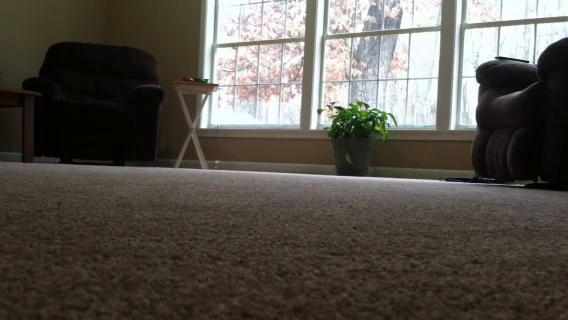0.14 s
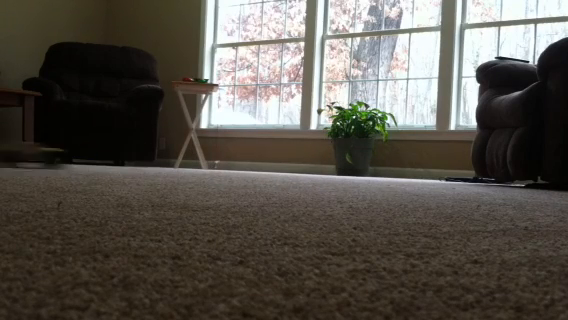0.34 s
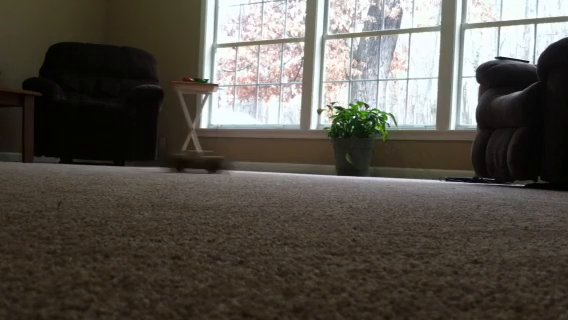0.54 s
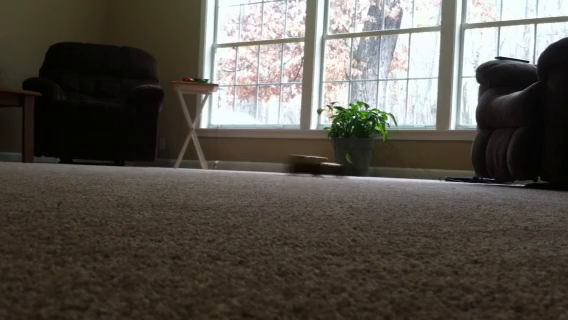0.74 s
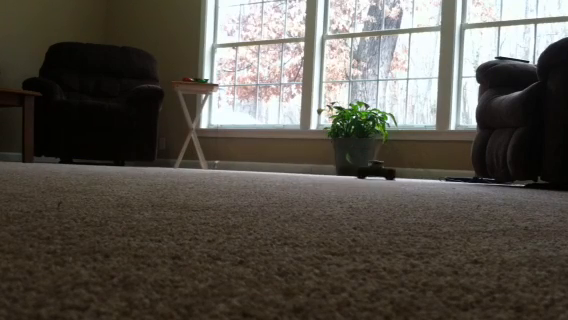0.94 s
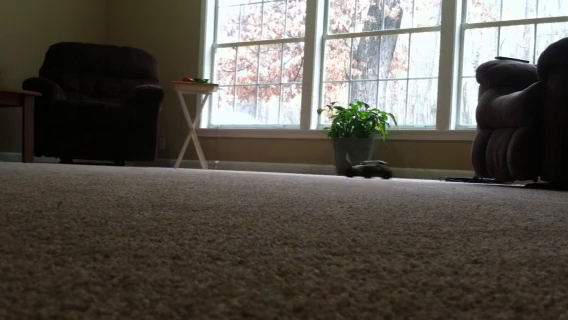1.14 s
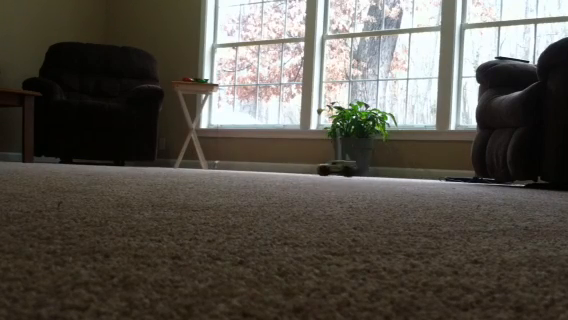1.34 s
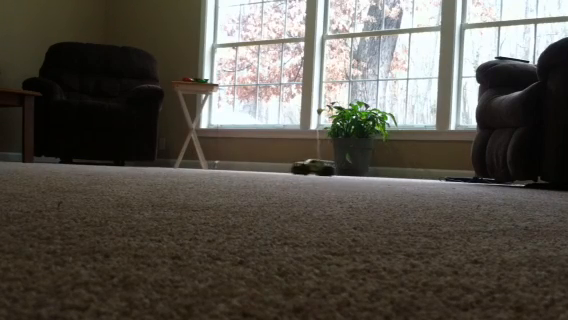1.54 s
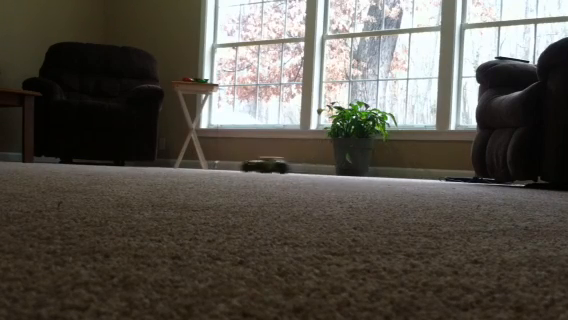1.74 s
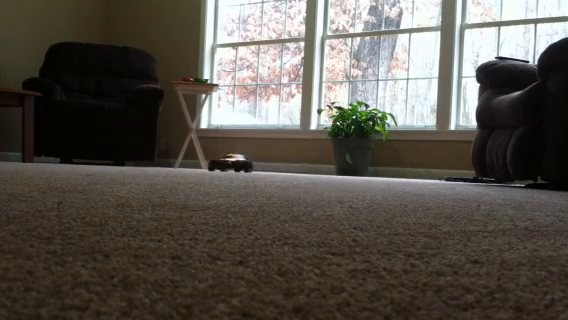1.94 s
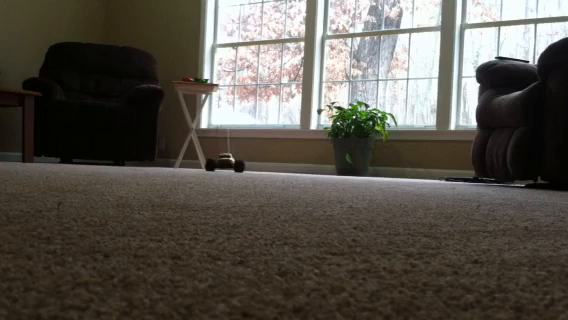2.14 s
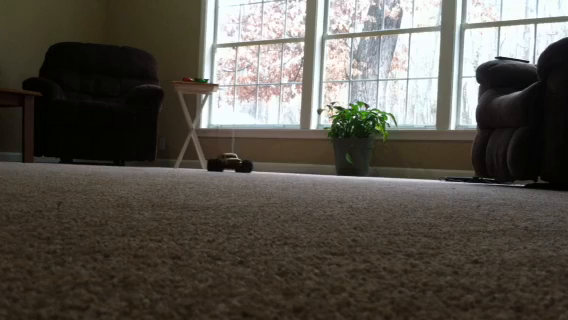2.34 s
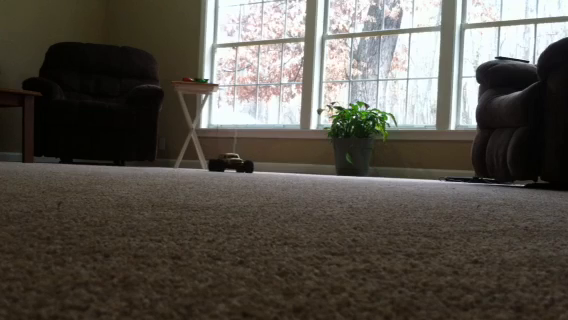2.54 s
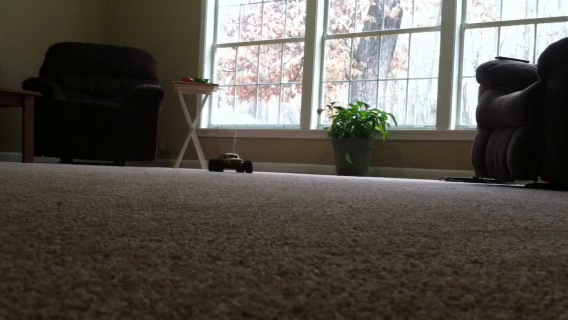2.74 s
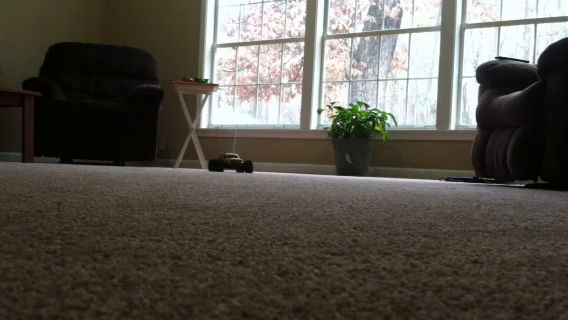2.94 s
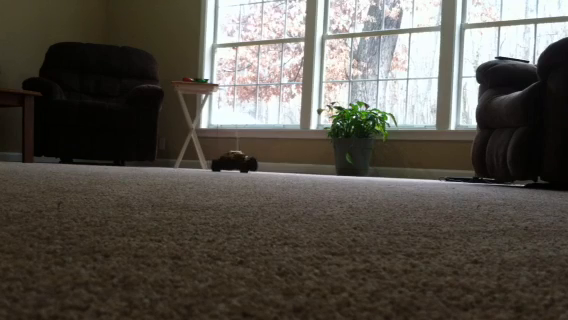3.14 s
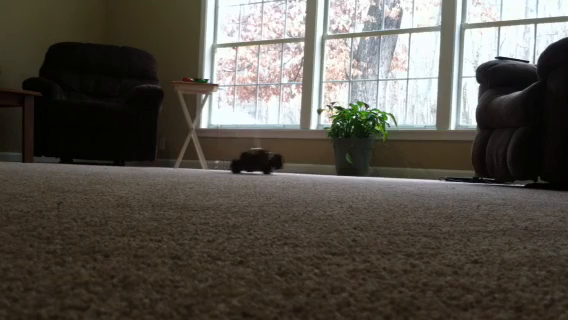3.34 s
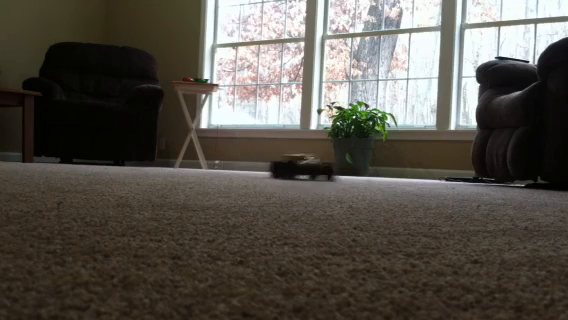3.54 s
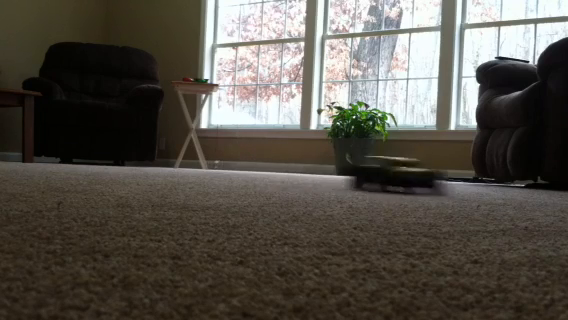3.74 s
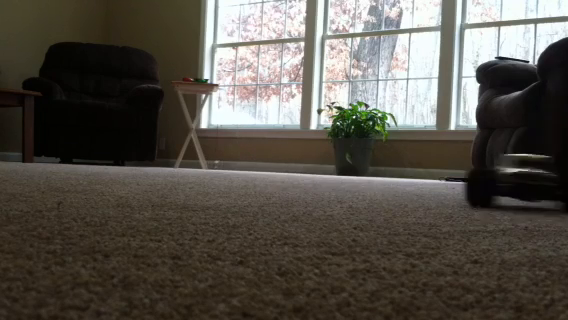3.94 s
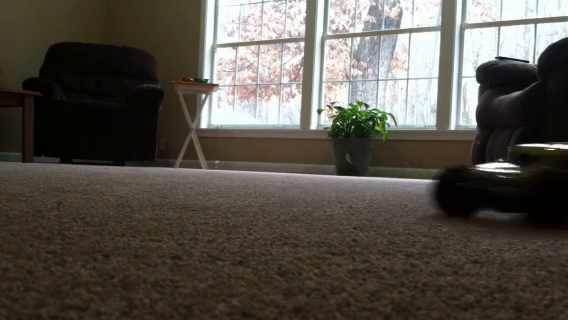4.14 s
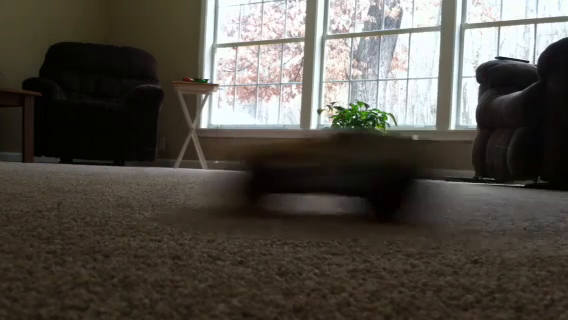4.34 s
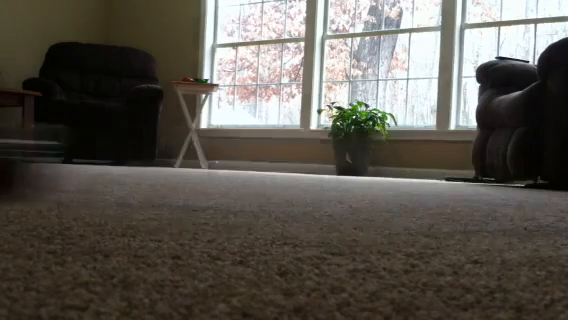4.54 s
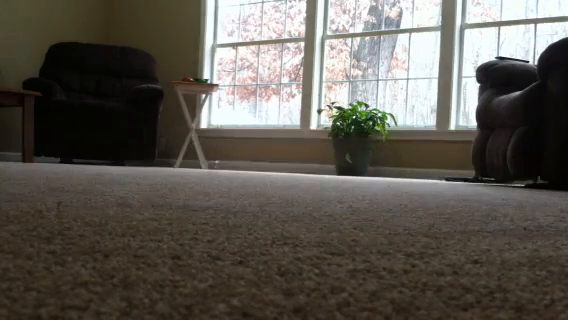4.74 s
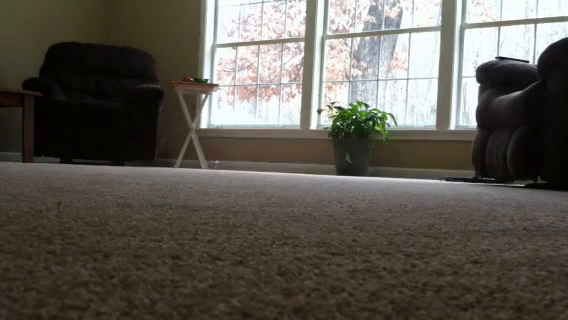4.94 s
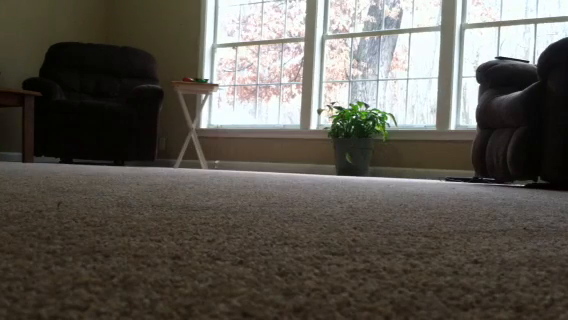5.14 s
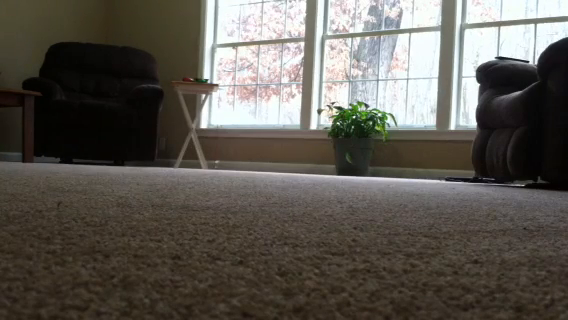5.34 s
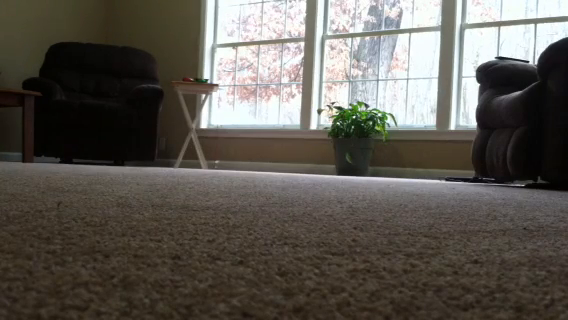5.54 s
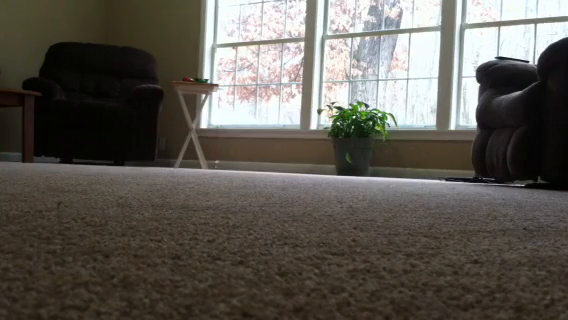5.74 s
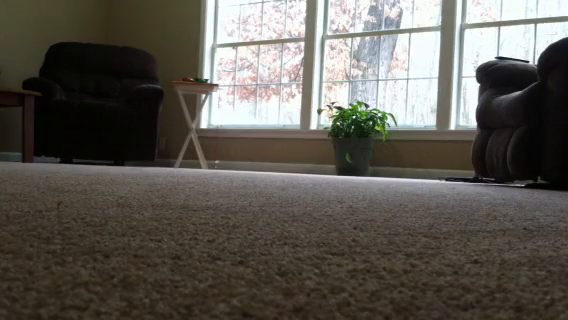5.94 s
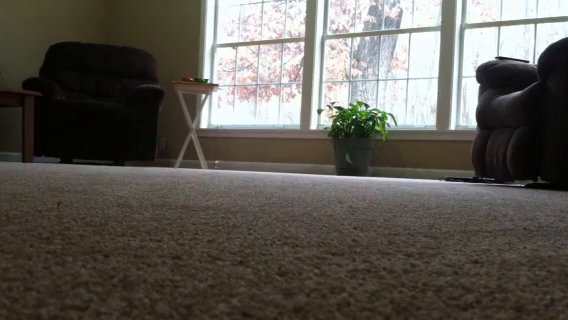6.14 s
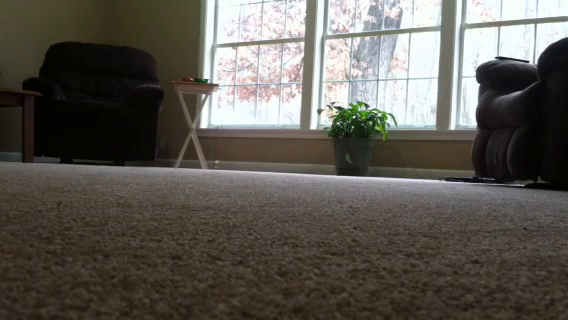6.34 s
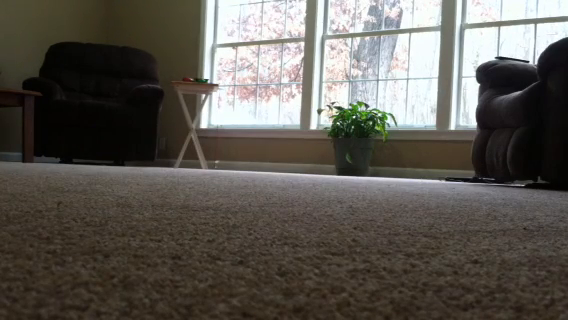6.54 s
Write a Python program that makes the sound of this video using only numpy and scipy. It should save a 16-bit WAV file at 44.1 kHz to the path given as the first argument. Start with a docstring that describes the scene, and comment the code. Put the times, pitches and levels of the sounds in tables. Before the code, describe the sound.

A small electric toy truck whines and rasps in bursts across carpet indoors, rattles close past with rapid gear clicks, then bumps something with a hollow thud.

```python
"""A whining, rattling, rasping toy truck darts about a carpeted living room, passes close by and bumps into something.
Each squeeze of the throttle sets a tooth rate that spins up, holds and coasts; tooth impacts excite the shell.
Filtered noise makes the tyre rumble, carpet brush and scrub; unsteady tooth impacts make the steering servo whirr.
Decaying tones and noise bursts make the gear ticks, the bump and one sharp click close by.
Steady sines hum like mains, a distant motor beats against them, and soft noise is the room air. Mono."""
import sys
import numpy as np
from scipy import signal
from scipy.fft import rfft, irfft, next_fast_len
from scipy.io import wavfile
from scipy.ndimage import uniform_filter1d, map_coordinates

SR = 44100
rng = np.random.default_rng(int(sys.argv[2]) if len(sys.argv) > 2 else 0)


def waveform_to_disk(signal):
    """Save audio, clipped to [-1, 1], as 16-bit WAV at the path in sys.argv[1]."""
    frames = np.transpose(np.atleast_2d(signal))
    scaled = np.clip(frames, -1, 1) * 32767
    samples = np.round(scaled).astype(np.int16)
    wavfile.write(sys.argv[1], SR, samples)


N = 295026

# All table levels are relative: the mix trims in the functions come on top.

# squeezes of the throttle: start t/s, length t/s, spin-up t/s, coasting before it stops t/s,
# tooth rate after spin-up f/Hz, further climb/(Hz/s), coasting tooth rate f/Hz, slowing/(Hz/s),
# coasting fade/(dB/s), rattle level/dB, rasp level/dB, tyre rumble level/dB, brushed carpet level/dB,
# whine re rattle under power level/dB, whine re rattle while coasting level/dB
THROTTLE_SQUEEZES = [ (0.0, 0.057, 0.01, 0.064, 979, 3, 910, 600, 23.5, -49, -59, -84, -61.5, 2, 2),
                     (0.0, 0.4, 0.19, .27, 2000, 300, 1150, 1200, 3, -45, -45.5, -56.5, -54.5, -1, -2),
                     (0.529, 0.2, 0.15, 0.19, 1370, 1202, 1454, 136, 4, -53, -55, -63.5, -62, -14, -5.5),
                     (0.939, 0.22, 0.089, 0.27, 1944, 4499.5, 1600, 1900, 11, -49, -49.5, -58.5, -60.5, -26, 1),
                     (1.522, 0.069, 0.02, 0.05, 972, -2, 945, 574, 33.5, -56, -67, -62, -72.5, -3, -2),
                     (1.559, 0.2, .15, 0.68, 1986, -4.5, 1208, 580, 19.5, -47, -53, -60, -62, 1.5, -7),
                     (3.058, 0.15, 0.025, 0.045, 973.2, 1, 942, 690, 32.5, -55, -73, -62, -97, -5, -10),
                     (3.15, .35, .19, .3, 1955, 4000, 1406, 603, 33, -47, -51.5, -59.5, -58.5, -2.5, -5),
                     (3.431, 0.28, 0.12, 0.22, 2973, 2000.5, 1016, 393, -10, -51, -50.5, -55, -53, -2.5, -15),
                     (3.857, 0.25, 0.053, 0.04, 1007, 0.5, 952, 630, 51, -54, -61, -56.5, -63.5, 3, -13),
                     (4.187, .146, .008, 0.02, 1308, 4499, 1380, 602, 38.5, -45, -83, -55, -63.5, 5.5, -2),
                     (4.205, 0.043, .02, 0.011, 2046, 2999, 1500, 600, 43.5, -47, -57, -68, -64, -8, -1),
                     (4.295, .125, 0.076, 0.11, 2779, -4, 2206, 600, 39, -42, -58, -56.5, -55.5, 1.5, -12),
                     (4.431, 0.095, 0.076, 0.054, 2288, 0.5, 1907, 594, 43.5, -43, -60, -56.5, -77, -16, -26),
                     (4.521, .21, 0.058, 0.081, 3162, 3001, 3503, 1.05, 70.5, -44, -54.5, -56.5, -54, -3.5, 4),
                     (4.74, 0.28, 0.077, .12, 1500, 1, 1349, 550, 40, -55.5, -57.5, -60.5, -58, -25, -20),
                     (5.021, 0.16, .11, .33, 1955, 5000, 1399, 500, 19, -46.5, -46.5, -54, -55, -12, -0.5),
                     (5.413, 0.23, 0.2, 0.43, 2034, 2999.5, 1359, 400, 0, -43.5, -42.5, -61, -54.5, -3, 0)]
# the truck's path: t/s, distance from the microphone/m
TRUCK_PATH = [(0, 2.24), (2.3, 1.67), (3.2, 3.13), (3.75, 1.25), (4.05, 1.1), (4.35, 0.86), (4.62, 0.61),
              (4.9, 1.24), (5.4, 1.69), (6.2, 2.26)]
CRAWL_HZ, FULL_HZ = 931, 2108  # slowest tooth rate; the rate beyond which speed adds no level
SETTLE_S, STOP_S = .045, .22  # time constant of the drop on release; 60 dB fade as the wheels stop
RATTLE_DB_PER_OCTAVE, RASP_DB_PER_OCTAVE = 8, 16  # louder with speed
RUMBLE_DB_PER_OCTAVE, BRUSH_DB_PER_OCTAVE = 5.5, 18
TYRE_LAG_S, TYRE_COAST_DB = 0.075, -2.5  # truck lags its motor; less rumble when the tyres no longer pull
SPUR_TEETH, RUB_DB = 61, 9.5  # the wobbling spur gear swings the coasting rasp this much once a turn
LOAD_WHINE_DB = 2  # the whine stands out most halfway through spin-up
ROOM_RADIUS_M = 1.47  # direct sound and echoes are equally loud here


def drive():
    """Each squeeze spins the motor up, holds it and lets it coast; speed and distance set the levels."""
    step = .002  # seconds per control point
    t = np.arange(0, N / SR, step)
    columns = np.transpose(THROTTLE_SQUEEZES)[:, :, None]
    start, length, spin_up, roll, top, climb, coast, slowing, fade = columns[:9]
    rattle_db, rasp_db, rumble_db, brush_db, whine_db, coast_whine_db = columns[9:]

    ramp = np.pi * np.clip((t - start) / spin_up, 0, 1)
    coasting = np.maximum(t - start - length, 0)
    released = coasting > 0
    load = np.exp(-coasting / SETTLE_S)
    rolling = (t >= start) * amp(-60 * np.maximum(coasting - roll, 0) / STOP_S)

    driven = CRAWL_HZ + (top - CRAWL_HZ) * (1 - np.cos(ramp)) / 2
    driven = driven + climb * np.maximum(t - coasting - start - spin_up, 0)
    speed = np.maximum(coast + (driven - coast) * load - slowing * coasting, CRAWL_HZ)

    spur_turns = np.cumsum(speed * released, axis=1) * step / SPUR_TEETH
    rub_db = RUB_DB * (np.cos(np.pi * spur_turns) ** 4 - .5) * released
    wet = 1 / (1 + (ROOM_RADIUS_M / np.interp(t, *np.transpose(TRUCK_PATH))) ** 2)
    octaves = np.log2(np.minimum(speed, FULL_HZ) / np.minimum(top, FULL_HZ))

    def power(db, per_octave):
        """Power of each squeeze: echoes alone, raised by the direct sound when near."""
        gain = rolling * amp(db + per_octave * octaves - fade * coasting)
        return gain ** 2 / wet + 1e-20

    def level(db, per_octave):
        """Gain of all squeezes together."""
        return np.sqrt(power(db, per_octave).sum(0))

    def lagged(gain):
        """Gain that follows the motor with the truck's inertia."""
        keep = np.exp(-step / TYRE_LAG_S)
        return signal.lfilter([1 - keep], [1, -keep], gain, zi=[keep * gain[0]])[0]

    def loudest(values):
        """Average over the squeezes, weighted by rattle power."""
        return np.average(values + 0 * t, axis=0, weights=power(rattle_db, RATTLE_DB_PER_OCTAVE))

    power_whine_db = whine_db + LOAD_WHINE_DB * np.sin(ramp)
    controls = dict(
        mesh_hz=CRAWL_HZ + (rolling * (speed - CRAWL_HZ)).max(0),
        wet=wet,
        rattle=level(rattle_db, RATTLE_DB_PER_OCTAVE),
        rasp=level(rasp_db + rub_db, RASP_DB_PER_OCTAVE),
        rumble=lagged(level(rumble_db + TYRE_COAST_DB * released, RUMBLE_DB_PER_OCTAVE)),
        brush=lagged(level(brush_db, BRUSH_DB_PER_OCTAVE)),
        whine_db=loudest(coast_whine_db + (power_whine_db - coast_whine_db) * load),
        load=loudest(load))
    return {name: np.interp(np.arange(N) / SR, t, values) for name, values in controls.items()}


# gearbox shell resonances at low, high and full speed: f/Hz, width f/Hz, level/dB
SHELL_LOW_MODES = [(913, 115, 4.5), (1298, 160, 6), (1760, 520, -4)]
SHELL_HIGH_MODES = [(1475, 540, -0.5), (2037, 243, 3.5), (2394, 620, -4)]
SHELL_FULL_MODES = [(1330, 300, -5), (1680, 280, 1.5), (2020, 220, -2.5)]
# tooth rates at which the low, high and full-speed resonances each have the shell to themselves: f/Hz
SHELL_TAKEOVER = [1305, 2160, 2820]
# how well the shell radiates the whine: f/Hz, level/dB
WHINE_RADIATION = [(500, 1), (780, 1), (950, -1), (1130, -7.5), (1330, 3), (1520, 1), (1730, -0.5),
                   (2000, -0.5), (2300, 1), (2800, -1.5), (3400, 1), (4200, 5.5), (5200, 5), (7500, -7)]
# spectrum of the rasping tooth edges: f/Hz, level/dB
RASP_SPECTRUM = [(500, -58), (2000, -46), (3100, -15), (3700, 0.5), (4200, 5.5), (4850, 2.5), (5600, 8),
                 (6700, 3.5), (8000, -3.5), (10000, -19), (12500, -24), (16000, -65)]
HUNT, HUNT_RATE = .012, 70  # a free-running gear train hunts: share of the tooth rate, knots a second
BEAM_DB, OVERTONE_DB = 19, -19  # full-speed whine is beamed, fading from afar; second partial
HOUSING_DB = -6  # pinion housing ring re shell, heard mainly from near


def gears(truck):
    """Tooth impacts rattle the shell and rasp; their regular part is a rough whine."""
    mesh_hz, wet, load = truck["mesh_hz"], truck["wet"], truck["load"]
    shares = [np.interp(mesh_hz, SHELL_TAKEOVER, row) for row in np.eye(3)]  # each speed wakes its modes
    beamed = wet * np.sqrt(shares[2])

    mesh_hz = mesh_hz * (1 + HUNT * (1 - load) * wobble(HUNT_RATE))
    shake = .013 * wobble(30) + .024 * wobble(350)  # slow load changes and fast backlash
    mesh_hz = mesh_hz * (1 + (1 + 2 * load) / 3 * shake)

    phase = 2 * np.pi * np.cumsum(mesh_hz) / SR
    pinion_teeth, runout = 14, .55
    lopsided = 1 + runout * np.sin(phase / pinion_teeth)  # an off-centre pinion adds sidebands
    chatter = unit(amp(2 * wobble(240)))
    partials = np.sin(phase) + amp(OVERTONE_DB) * np.sin(2 * phase)
    whine = unit(chatter * lopsided) * np.sqrt(2) * partials
    whine = filtered(whine, lambda hz: amp(along(WHINE_RADIATION, hz)))

    impacts = teeth(mesh_hz, scatter=.6, uneven_db=2.0) * chatter
    mode_sets = [SHELL_LOW_MODES, SHELL_HIGH_MODES, SHELL_FULL_MODES]
    shell = sum(np.sqrt(share) * unit(ringing(impacts, modes)) for share, modes in zip(shares, mode_sets))
    housing_ring = unit(ringing(impacts, [(2740, 320, 2.3), (3465, 350, 3.0)]))
    housing = amp(HOUSING_DB) * (1 - wet) ** 2 * housing_ring

    clear = amp(truck["whine_db"] - BEAM_DB * beamed)
    box = truck["rattle"] * (housing + (shell + clear * room(whine, wet)) / np.sqrt(1 + clear ** 2))

    flutter = amp(.8 * wobble(55) + 1.1 * wobble(150))
    edges = coloured(teeth(mesh_hz, scatter=0.33, uneven_db=3.5) * flutter, RASP_SPECTRUM)
    rasp = room(truck["rasp"] * turning(edges), wet=0.27)
    return amp(-2.5) * box + amp(-1.5) * rasp


BEAMING_DB = 2.2  # rms swing of the rasp bands


def turning(x):
    """Broad bands swell and sink at random, standing in for beaming as the truck's heading changes."""
    z = signal.stft(x, nperseg=512)[2]
    field = rng.standard_normal(z.shape)
    for size, axis in [(6, 0), (4, 0), (24, 1), (12, 1)]:  # smooth over frequency, then over time
        field = uniform_filter1d(field, size, axis)
    gain = unit(amp(BEAMING_DB * unit(field)))
    return signal.istft(z * gain, nperseg=512)[1][:N]


# spectra of the rumbling treads and the carpet fibres: f/Hz, level/dB
TREAD_SPECTRUM = [(25, -50), (60, -31), (120, -15.5), (220, -9), (310, -3.5), (410, -4.5), (520, -1),
                  (720, -2.5), (950, 1.5), (1150, -4.5), (2000, -7.5), (5000, -41.5)]
FIBRE_SPECTRUM = [(300, -51), (1500, 12.5), (3500, 4.5), (7000, 11.5), (9000, 5.5), (12000, 3), (13500, -7),
                  (15800, -19)]
# tyres scrub sideways in tight turns: start t/s, length t/s, level/dB
TYRE_SCRUBS = [(1.0, 0.19, -52.5), (3.87, 0.39, -54.5), (5.08, 0.07, -51)]
# resonances of the scrubbing tyres and chassis: f/Hz, width f/Hz, level/dB
CHASSIS_MODES = [(520, 150, 12), (1010, 400, -6), (2470, 320, 3)]
SCRUB_ATTACK_S, SCRUB_RELEASE_S = 0.041, 0.23


def tyres(truck):
    """Treads drum on the floor, brush the carpet pile and growl in the turns, all from uneven noise."""
    rumble = coloured(rng.standard_normal(N) * amp(1.3 * wobble(70)), TREAD_SPECTRUM)
    pile = coloured(rng.standard_normal(N) * amp(0.87 * wobble(150)), FIBRE_SPECTRUM)
    growl = unit(ringing(rng.standard_normal(N) * amp(4.5 * wobble(120)), CHASSIS_MODES))
    scrub = swells(TYRE_SCRUBS, SCRUB_ATTACK_S, SCRUB_RELEASE_S) * growl
    return amp(3.0) * truck["rumble"] * rumble + amp(5.5) * truck["brush"] * pile + scrub


# gear teeth catch and tick: t/s, middle level/dB, treble level/dB
TOOTH_TICKS = [(1.524, -63, -96), (3.89, -36.5, -39), (3.914, -42, -52), (3.937, -37, -54),
               (4.108, -47, -55), (4.1515, -38, -58), (3.963, -34, -47), (3.998, -31.8, -49),
               (4.028, -32.5, -50), (4.0608, -30, -37), (4.2731, -31, -38), (4.301, -32, -50),
               (4.334, -34, -49), (4.357, -27, -34), (4.403, -28, -33), (4.538, -29, -33),
               (4.5623, -33, -51), (4.833, -39, -32), (4.858, -39, -33), (4.883, -37, -34),
               (4.908, -41, -36), (4.942, -40, -32), (4.969, -40, -32), (4.998, -36, -32.5),
               (5.034, -38, -32.5), (5.062, -41, -36), (5.088, -35, -31), (5.2371, -39, -33),
               (5.271, -41, -33), (5.36, -57, -38)]
# the shell ringing under a tick: f/Hz, level/dB, 60 dB decay t/s
TICK_MODES = [(1630, -3.5, 0.018), (2050, -3.5, 0.017), (2497, -6.5, .014)]


def ticks():
    """A catching tooth snaps and briefly rings the shell."""
    t = np.arange(SR // 4) / SR
    low, high = np.zeros((2, N))
    for s, middle_db, treble_db in TOOTH_TICKS:
        detune = 1 + .03 * rng.standard_normal(len(TICK_MODES))
        ring = sum(amp(db - 60 * t / t60) * np.sin(2 * np.pi * hz * k * t)
                   for (hz, db, t60), k in zip(TICK_MODES, detune))
        add(low, s, amp(middle_db + 3) * ring * (1 - np.exp(-t / .0004)))
        add(high, s, amp(treble_db) * burst(t60=0.021))
    return room(low + amp(5.0) * ringing(high, [(5000, 2200, 0)]), wet=0.25)


# body and wheels hit an obstacle: t/s, thud level/dB, clack level/dB
BUMP_BLOWS = [(6.131, -37.5, -65), (6.138, -36, -36.5), (6.146, -33, -42), (6.154, -29, -31.5),
              (6.166, -27, -36), (6.179, -28.5, -35), (6.203, -43, -57), (6.224, -40, -60)]
# spectrum of the thuds: f/Hz, level/dB
THUD_SPECTRUM = [(30, -54), (80, -26), (125, -10), (200, -2.5), (260, -6.5), (340, -6.5), (480, -4.5),
                 (650, -1), (850, 3.5), (1100, -3), (1600, -4), (2100, -9), (3000, -17), (5700, -20.5),
                 (15700, -45)]
# hard plastic in the bump: f/Hz, width f/Hz, level/dB
CLACK_MODES = [(5670, 2100, 0.5), (9000, 2200, -6)]
# the hollow ring of the bump: f/Hz, level/dB, 60 dB decay t/s
HOLLOW_MODES = [(208, -8, 0.88), (358, 10, 0.28), (505, -1, 0.37), (664, 7, 0.087), (737, 6, 0.29),
                (798, 3, 0.2), (836, -3, 0.73), (910, -4, 0.52), (1110, 0.5, 0.25), (1270, 0, 0.31)]
BUMP_GIVE_S = .004


def bump():
    """Bumper, body and wheels strike in quick turn, thud and clack; a hollow ring and the room answer."""
    blows, clacks, boom = np.zeros((3, N))
    give = 1 - np.exp(-np.arange(SR // 4) / SR / BUMP_GIVE_S)  # soft plastic yields before it pushes back
    for s, db, clack_db in BUMP_BLOWS:
        add(blows, s, amp(db) * burst(t60=0.055) * give)
        add(clacks, s, amp(clack_db) * burst(t60=0.042))

    t = np.arange(SR // 2) / SR
    ring = sum(amp(db - 60 * t / t60) * np.sin(2 * np.pi * (hz * t + rng.random()))
               for hz, db, t60 in HOLLOW_MODES)
    add(boom, 6.152, amp(-44.5) * ring * (1 - np.exp(-t / .012)))

    thuds = filtered(blows, lambda hz: unit(amp(along(THUD_SPECTRUM, hz))))
    return boom + amp(7.5) * room(thuds + ringing(clacks, CLACK_MODES), wet=0.43)


# the steering servo turns the wheels: start t/s, length t/s, level/dB
STEERING = [(.55, 0.18, -50.5), (2.33, 0.2, -55), (2.69, 0.036, -58), (2.84, 0.075, -56),
            (3.03, 0.059, -65), (6.04, 0.16, -51), (6.34, 0.085, -57.5), (6.49, 0.09, -65)]
# spectrum of the servo whirr: f/Hz, level/dB
SERVO_SPECTRUM = [(1880, -41), (3200, -38), (3350, -39), (4010, -19), (4460, -16.5), (5630, -6), (6100, -7),
                  (7550, -1.5), (11300, -10), (12300, -19), (14100, -20), (15700, -26)]
STEER_ATTACK_S, STEER_RELEASE_S = 0.054, 0.38


def servo():
    """The tiny steering gears spin too fast and unevenly for a pitch: a thin hissing whirr."""
    impacts = teeth(2400 * (1 + 0.064 * wobble(7.3)), scatter=0.35, uneven_db=3)
    whirr = unit(room(coloured(impacts, SERVO_SPECTRUM), wet=0.96))
    return amp(-0.5) * swells(STEERING, STEER_ATTACK_S, STEER_RELEASE_S) * whirr


# the ring of the close click: f/Hz, level/dB, 60 dB decay t/s
CLICK_MODES = [(512, 4, 0.031), (640, 5.5, 0.03), (897, 1.5, 0.026), (1226, -1, 0.016), (1443, -7, 0.028),
               (1853, -5, 0.017), (2205, -7, 0.023), (2590, -2, 0.015), (3560, 0, 0.011), (4900, -1, 0.012),
               (5780, -12, 0.016), (6550, -5, .016), (7400, -4, 0.018), (8850, 0, .01), (11100, 2, .009)]


def click():
    """A bright plastic snap, then the hollow ring of a small housing."""
    t = np.arange(SR // 4) / SR
    snap, body = np.zeros((2, N))
    crack = np.sin(2 * np.pi * 9600 * t) * amp(-60 * t / 0.0012) * (1 - np.exp(-t / .0001))
    fizz = amp(-34) * burst(t60=.013)
    add(snap, 3.0444, amp(-12) * crack + fizz)

    ring = sum(amp(db - 60 * t / t60) * np.sin(2 * np.pi * hz * t) for hz, db, t60 in CLICK_MODES)
    add(body, 3.0448, amp(-31.0) * ring * (1 - np.exp(-t / 0.0036)))
    snap = filtered(snap, lambda hz: hz / (hz + 300) / (1 + (hz / 13000) ** 8))  # trim both ends
    return room(snap + body, wet=0.084)


# mains hum partials: f/Hz, rms level/dB
MAINS_HUM = [(120, -86), (180, -73), (240, -70.5), (300, -79.5)]
# a distant appliance motor spins up and beats against the hum: t/s, f/Hz, rms level/dB
APPLIANCE_MOTOR = [(5.15, 95, -100), (5.3, 109, -69), (5.42, 116, -76.5), (5.8, 117.3, -74),
                   (6.69, 117.3, -75)]
# spectrum of the still room air: f/Hz, level/dB
AIR_SPECTRUM = [(25, -16), (50, -25), (80, -18), (130, -5), (200, 0), (280, -3.5), (400, -8), (900, -5.5),
                (1500, -11.5), (3000, -15), (7000, -15), (12000, -30), (15700, -39)]


def background():
    """Still room air as noise, mains hum as wavering sines and a distant motor as one gliding sine."""
    t = np.arange(N) / SR
    hum = sum(amp(db + 1.3 * wobble(5.5)) * np.sqrt(2) * np.sin(2 * np.pi * (hz * t + rng.random()))
              for hz, db in MAINS_HUM)
    motor_hz, motor_db = curves(APPLIANCE_MOTOR)
    motor = amp(motor_db) * np.sqrt(2) * np.sin(2 * np.pi * np.cumsum(motor_hz) / SR)
    air = amp(-66.5) * coloured(rng.standard_normal(N), AIR_SPECTRUM)
    return hum + motor + air


# how long the walls echo: f/Hz, 60 dB decay t/s
WALL_DECAY = [(150, 0.39), (900, 0.38), (3000, 0.42), (8000, 0.12), (15000, 0.15)]


def room(x, wet):
    """Direct sound plus a share wet (of power) of diffuse wall echoes."""
    hz, t, z = signal.stft(rng.standard_normal(SR // 2), SR, nperseg=256)
    decay = amp(-60 * t / along(WALL_DECAY, hz)[:, None])
    tail = signal.istft(z * decay, SR, nperseg=256)[1]
    echoes = signal.fftconvolve(x, tail / np.linalg.norm(tail))[:N]
    wet = np.clip(wet, 0, 1)
    return np.sqrt(1 - wet) * x + np.sqrt(wet) * echoes


def teeth(mesh_hz, scatter, uneven_db):
    """One impact per gear tooth, scattered in time (share of a tooth) and in strength, at rms 1."""
    turns = np.cumsum(mesh_hz) / SR  # teeth passed so far
    count = np.arange(int(turns[-1]))
    chance = rng.standard_normal((len(count), 2))
    at = np.interp(count + scatter * chance[:, 0], turns, np.arange(N)).astype(int)
    hits = np.bincount(at, amp(uneven_db * np.clip(chance[:, 1], -2, 2)), N)
    return unit(hits / np.sqrt(mesh_hz))  # equal power at every rate


def swells(rows, attack, release):
    """Gain of events (start, length, dB): each rises, holds, then falls 60 dB in release seconds."""
    t = np.arange(N) / SR
    return sum(np.clip((t - s) / attack, 0, 1) * amp(db - 60 * np.maximum(t - s - length, 0) / release)
               for s, length, db in rows)


def burst(t60):
    """A quarter second of noise that falls 60 dB in t60 seconds."""
    t = np.arange(SR // 4) / SR
    return rng.standard_normal(len(t)) * amp(-60 * t / t60)


def ringing(x, modes):
    """x through resonances (Hz, width, dB), each applied twice for steep skirts."""
    def response(f):
        total = 0
        for k, (centre, width, db) in enumerate(modes):
            once = 1j * f * width * 1.6 / (centre * centre - f * f + 1.5j * f * width)
            total = total + amp(db) * once ** 2 * 1j ** k  # neighbours a quarter turn apart
        return total
    return filtered(x, response)


def coloured(x, spectrum):
    """x shaped by a spectrum, at rms 1."""
    return unit(filtered(x, lambda hz: amp(along(spectrum, hz))))


def filtered(x, response):
    """x times a response of frequency."""
    m = next_fast_len(len(x) + SR // 4)
    return irfft(rfft(x, m) * response(np.fft.rfftfreq(m, 1 / SR)), m)[:len(x)]


def wobble(rate):
    """A smooth random curve, rate knots a second."""
    knots = rng.standard_normal(int(N * rate / SR) + 4)
    return map_coordinates(knots, [np.arange(N) * rate / SR])


def curves(rows):
    """One value per sample for each column after the time."""
    s, *cols = np.transpose(rows)
    return [np.interp(np.arange(N) / SR, s, c) for c in cols]


def along(points, hz):
    """(Hz, value) points read on a log axis."""
    f, v = np.transpose(points)
    return np.interp(np.log(hz + 1), np.log(f + 1), v)


def add(track, s, sound):
    """Mix a sound into the track at s seconds."""
    part = track[round(s * SR):][:len(sound)]
    part += sound[:len(part)]


def amp(db):
    """Decibels to gain."""
    return 10 ** (np.asarray(db) / 20)


def unit(x):
    """Scale to rms 1."""
    return x / np.sqrt(np.mean(x ** 2) + 1e-20)


def scene():
    """Everything reaches one microphone, heard alike in both channels."""
    truck = drive()
    mono = gears(truck) + tyres(truck) + ticks() + servo() + click() + bump() + background()
    return np.array([mono, mono])


TOP_HZ = 15800


def record(dry):
    """A sharp band limit leaves nothing from TOP_HZ up."""
    return np.array([filtered(channel, lambda hz: hz < TOP_HZ) for channel in dry])


dry = scene()
out = record(dry)
waveform_to_disk(out)
```